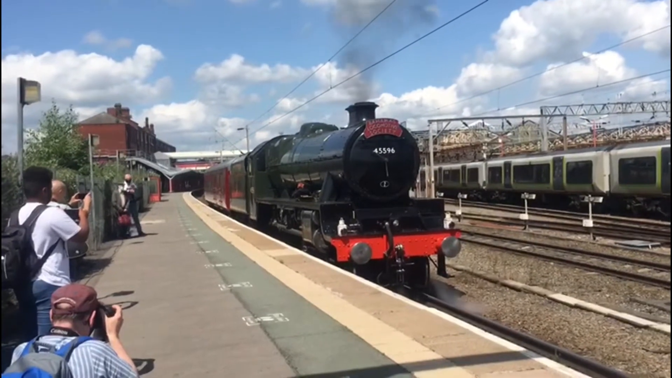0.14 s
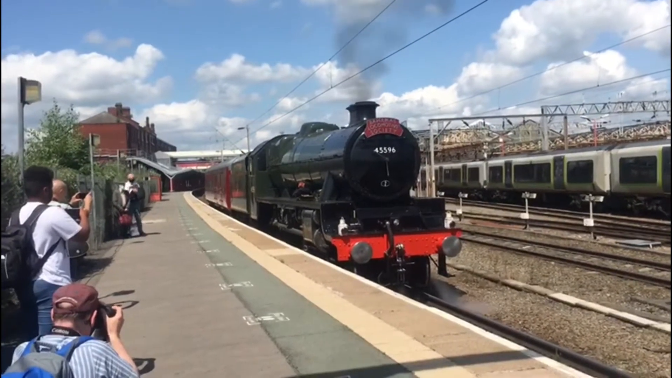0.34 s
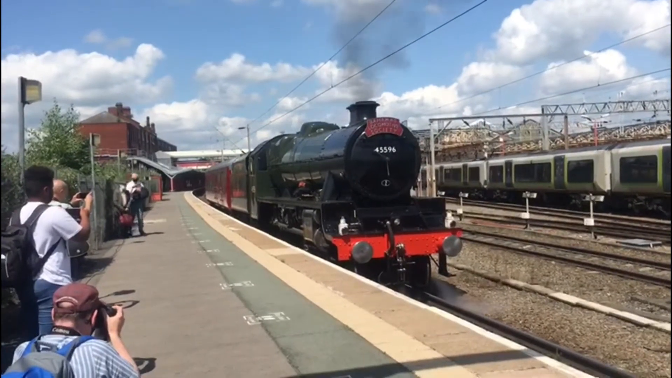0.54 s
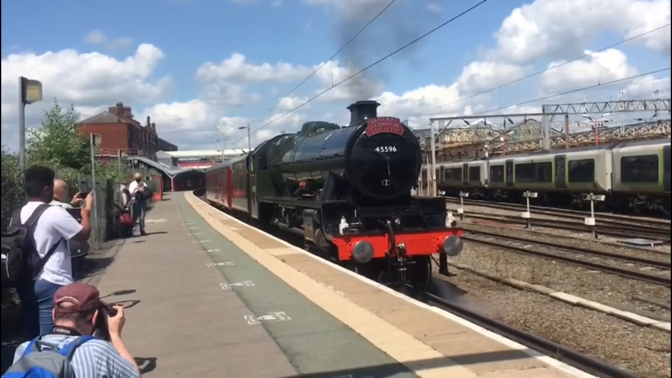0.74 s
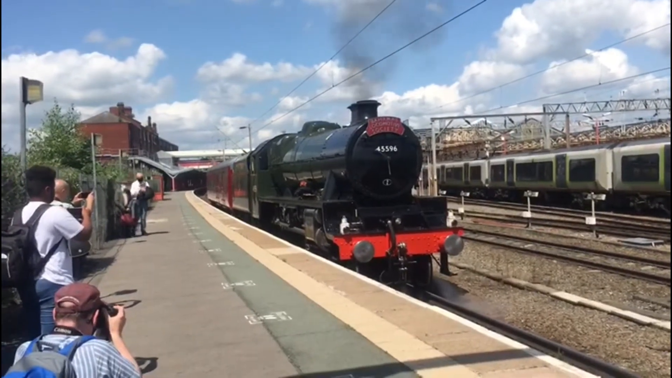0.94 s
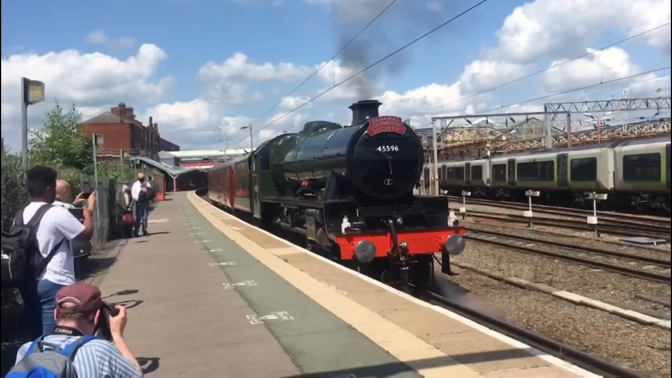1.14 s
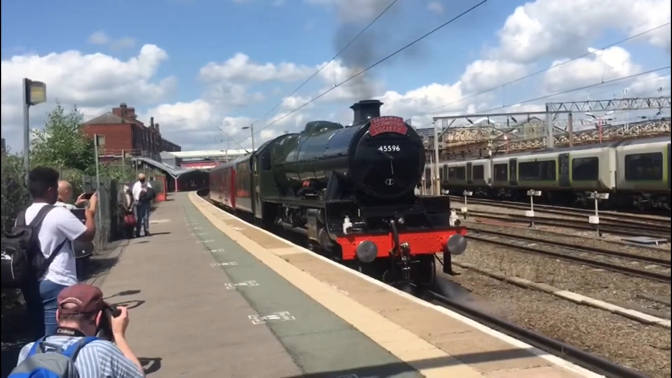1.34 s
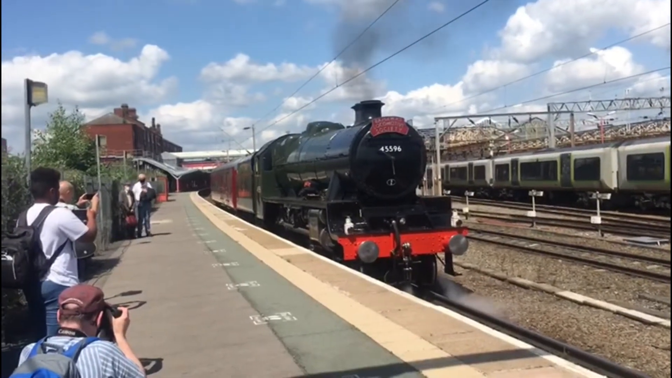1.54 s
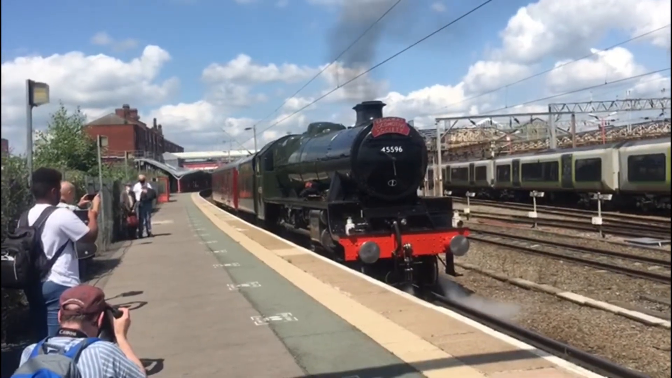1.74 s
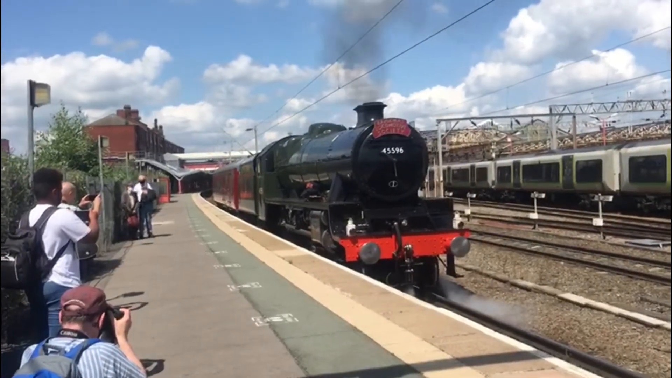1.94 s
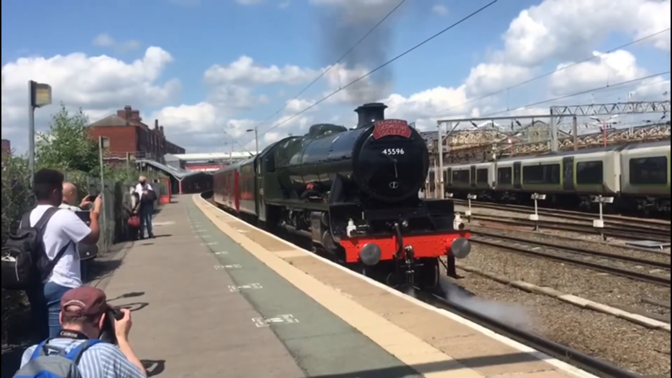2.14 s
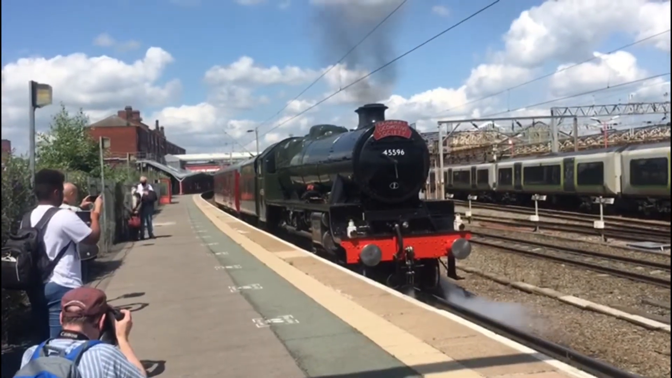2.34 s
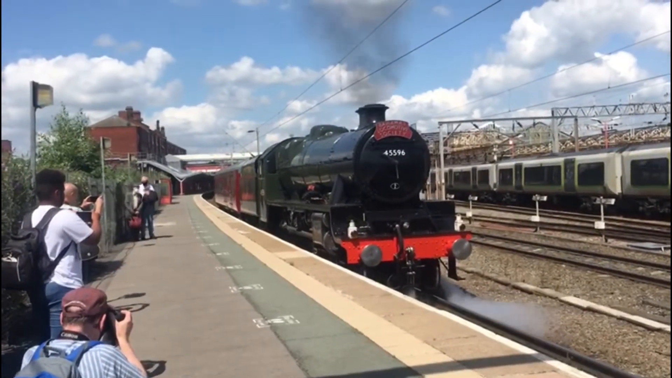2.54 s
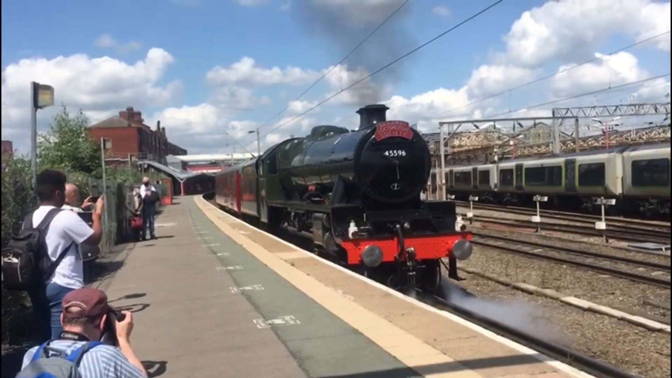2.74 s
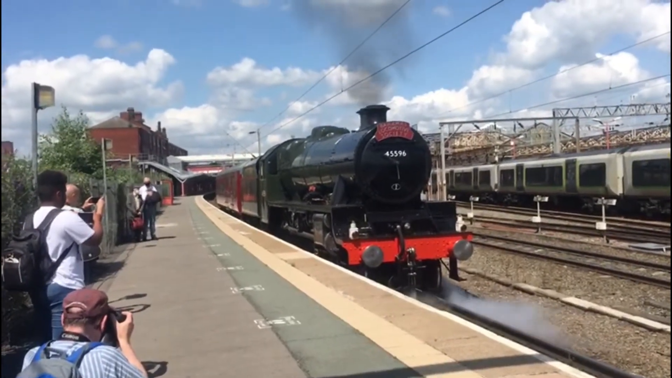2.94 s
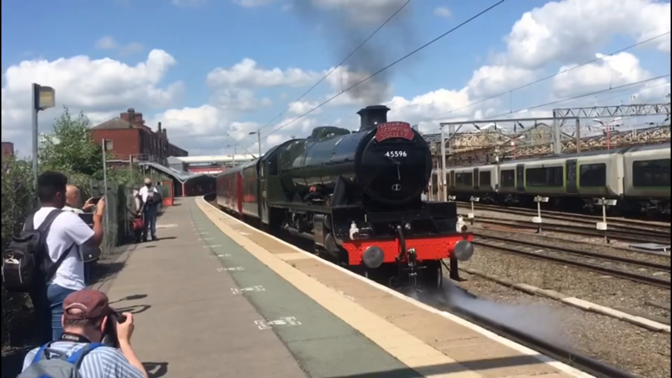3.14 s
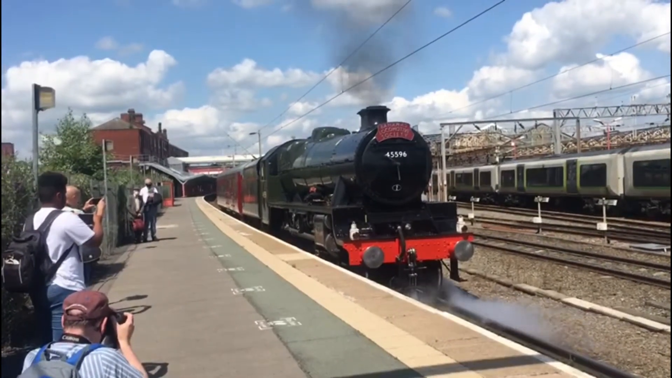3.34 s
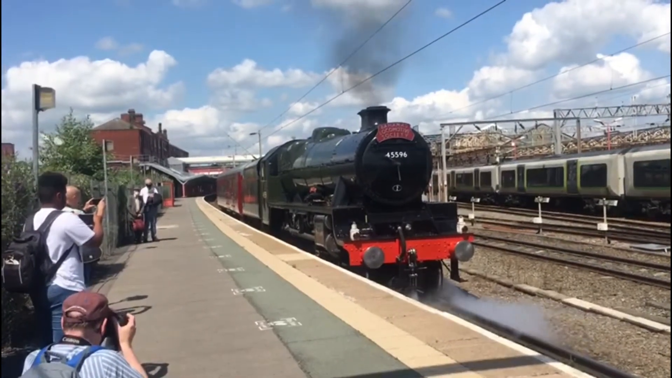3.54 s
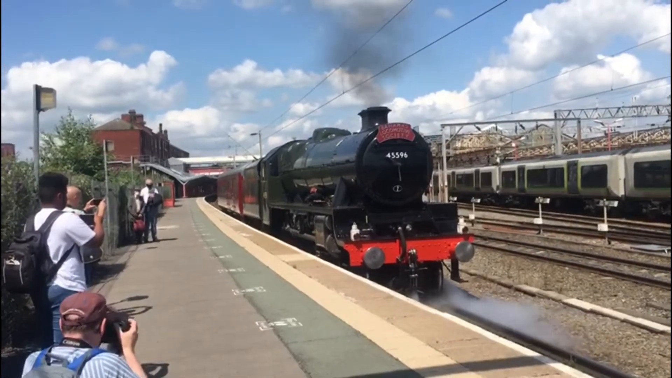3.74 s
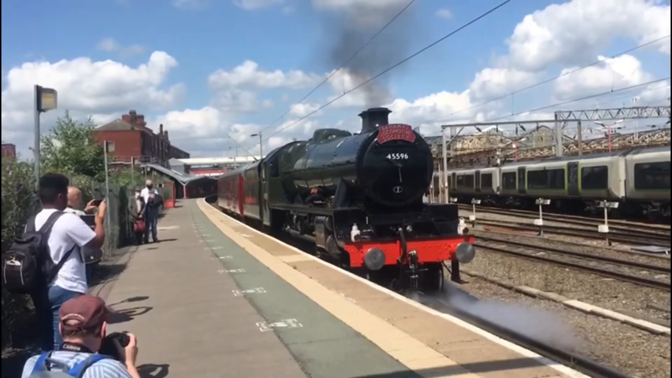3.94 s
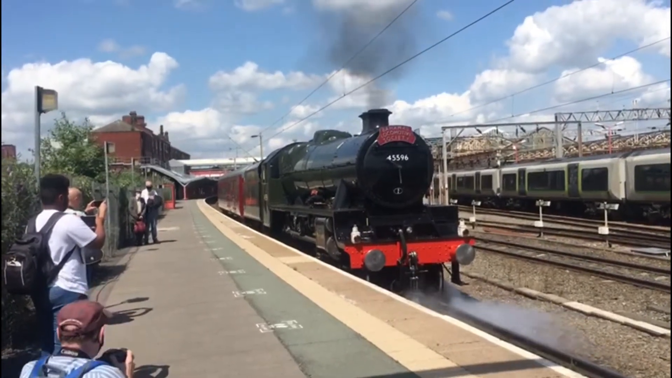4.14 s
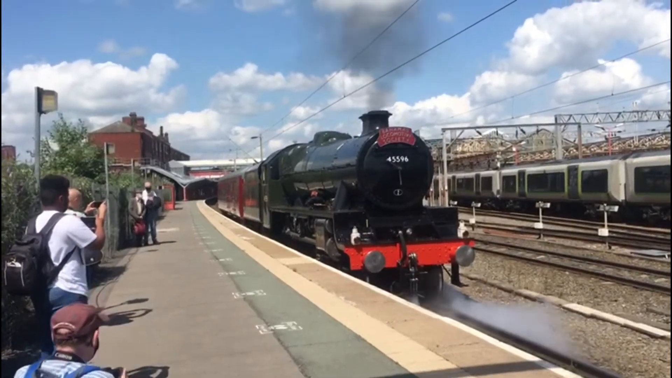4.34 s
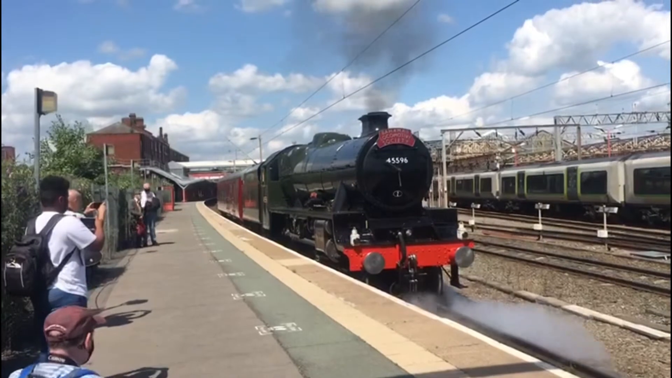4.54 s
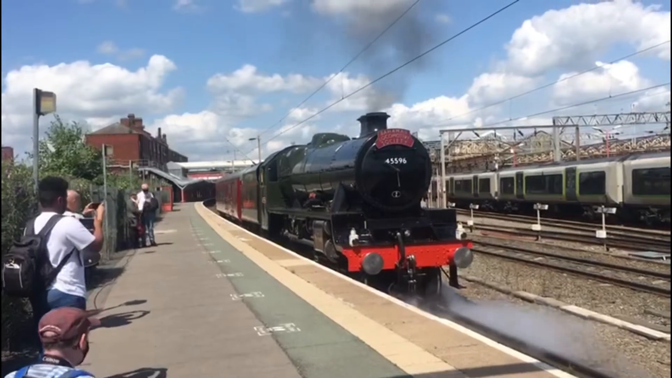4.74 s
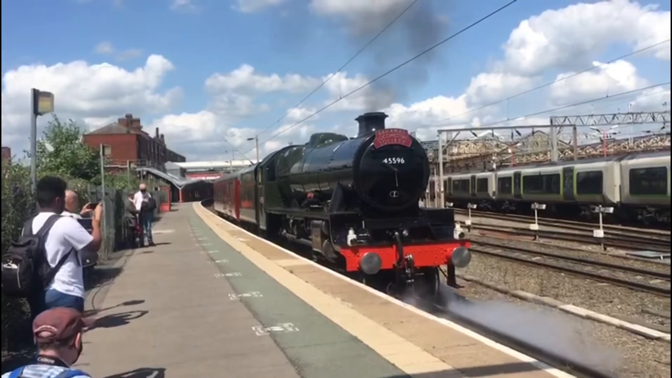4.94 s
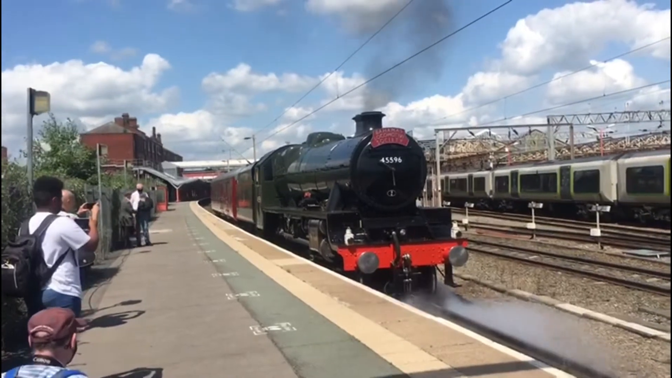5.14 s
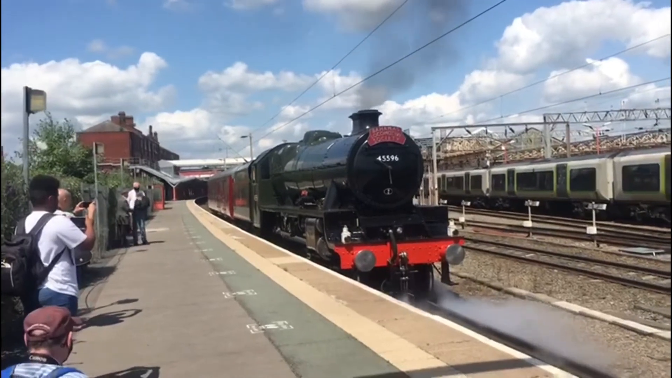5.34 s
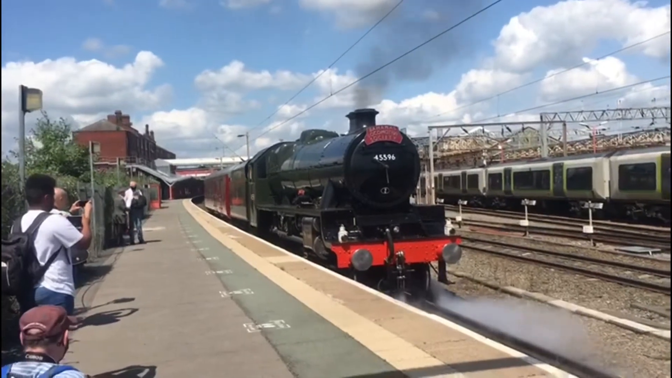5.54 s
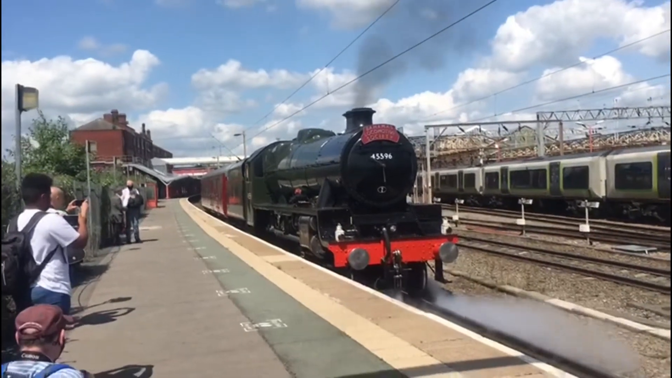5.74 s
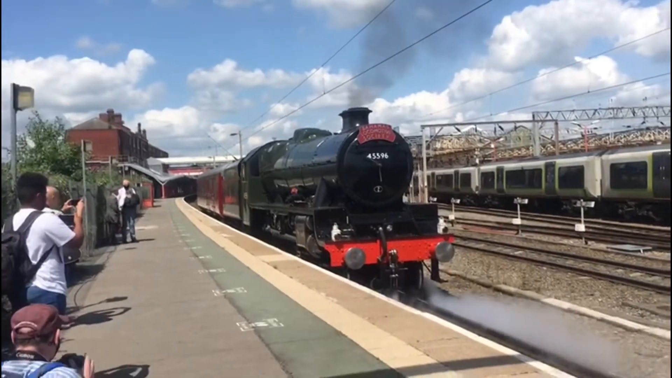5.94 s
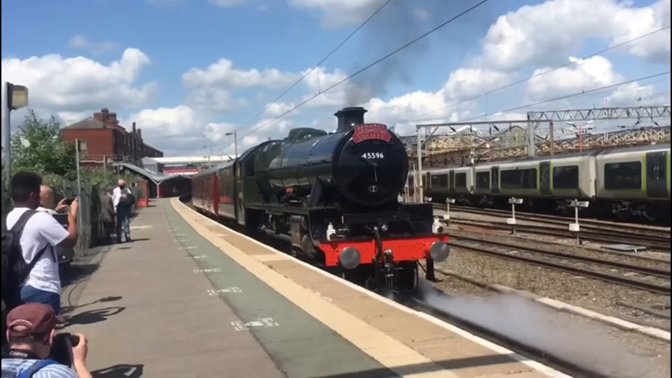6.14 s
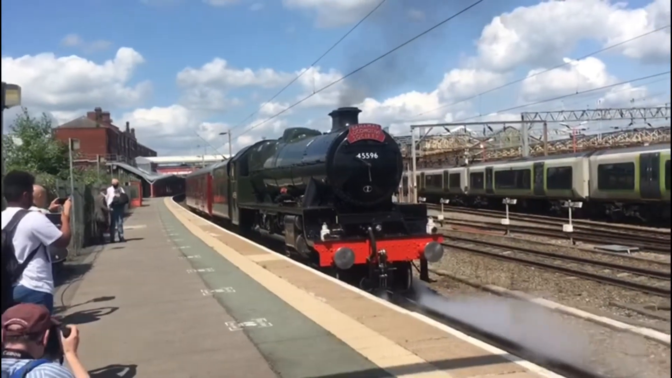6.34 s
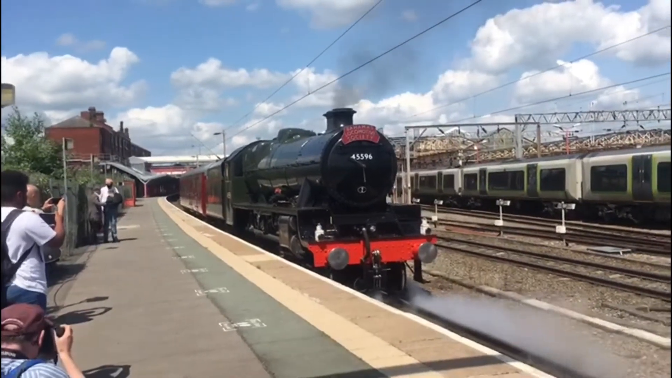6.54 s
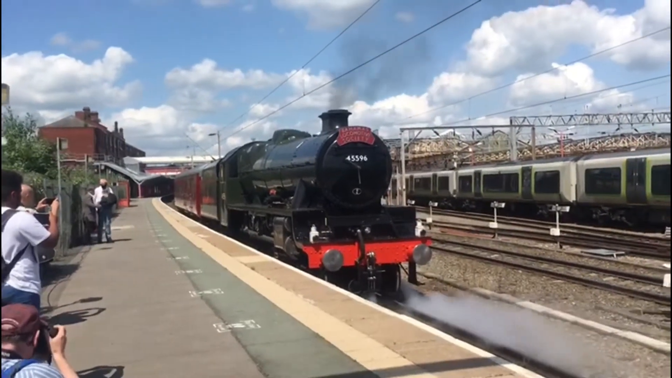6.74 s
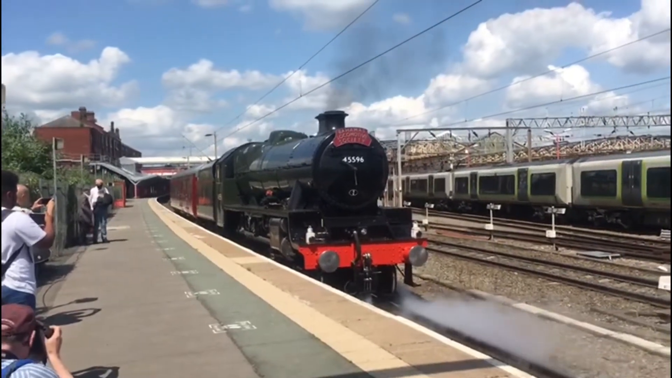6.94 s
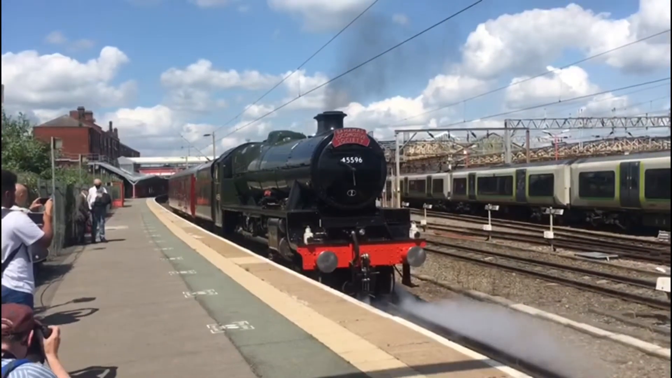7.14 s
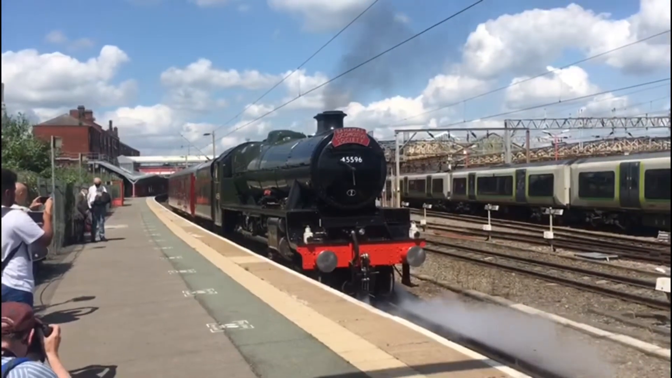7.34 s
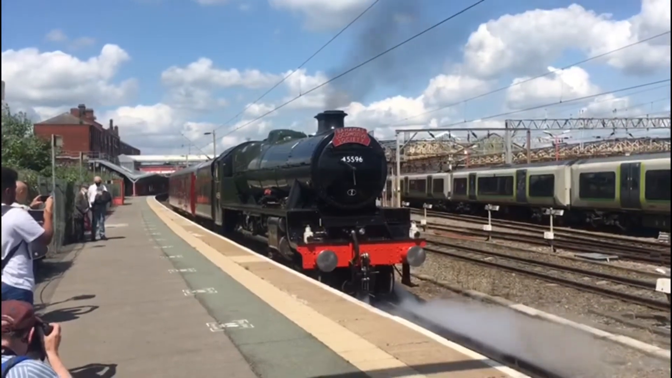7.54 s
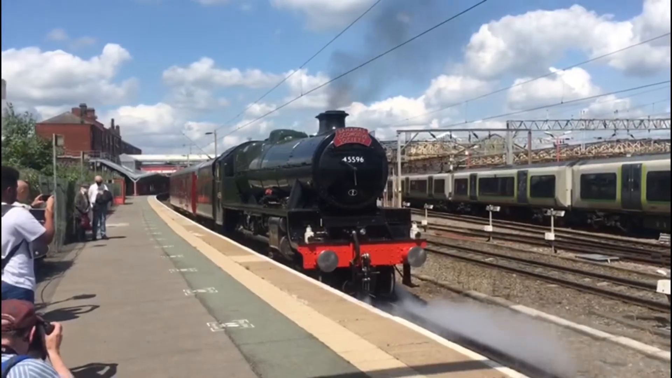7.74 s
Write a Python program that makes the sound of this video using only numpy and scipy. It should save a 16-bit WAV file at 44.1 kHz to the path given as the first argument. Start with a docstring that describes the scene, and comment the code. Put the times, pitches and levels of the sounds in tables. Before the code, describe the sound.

A steam locomotive idles in an open-air station with a low rumble and a soft leaking hiss, a faint hum behind it. Far down the platform, a high whistle gives three short, reverberant trills. The cylinder drains then open, and escaping steam builds to a loud, hissing roar with a high pipe ring, covering the rumble and holding to the end. Brief puffs of wind buffet the one microphone late on.

```python
"""A station platform, a steam locomotive standing: its fire drones, a gland hisses, a machine hums,
and a distant whistle trills three short blasts, the last followed by a brief echo. Then the cylinder
drain cocks open: a jet of steam swells, rings in the drain pipes and settles to a roar, scattered by
the wheels and frames. The low drone and rumble duck while the jet is loud.
In the last few seconds, gusts of breeze buffet the single microphone."""
import sys
import numpy as np
from scipy import signal
from scipy.fft import rfft, irfft, next_fast_len
from scipy.io import wavfile
from scipy.ndimage import uniform_filter1d, map_coordinates

SR = 44100
rng = np.random.default_rng(int(sys.argv[2]) if len(sys.argv) > 2 else 0)


def pcm_store(signal):
    """Save signal as 16-bit PCM."""
    levels = np.round(np.clip(np.atleast_2d(signal), -1, 1) * 32767)
    wavfile.write(sys.argv[1], SR, levels.astype(np.int16).T)


N = 343539

# pipework resonances, rung by both the leak and the jet: pitch_hz, width_hz, level_db
PIPE_MODES = [(2877, 140, -1), (3034, 180, 0.5), (3440, 104, 3), (3555, 85, 0), (5570, 230, -6.5),
              (5740, 140, -8), (6980, 170, -26)]


def amp(db):
    """Decibels to gain."""
    return 10 ** (np.asarray(db) / 20)


def unit(x):
    """Scale to rms 1."""
    return x / np.sqrt(np.mean(x ** 2) + 1e-20)


def curves(rows):
    """Breakpoints to envelopes, one for each column after time_s."""
    times, *columns = np.transpose(rows)
    return [np.interp(np.arange(N) / SR, times, column) for column in columns]


def wobble(rate):
    """Smooth random modulation, rate knots a second."""
    knots = rng.standard_normal(int(N * rate / SR) + 4)
    return map_coordinates(knots, [np.arange(N) * rate / SR])


def filtered(x, response):
    """EQ x with a gain given as a function of frequency."""
    size = next_fast_len(N + SR // 2)
    return irfft(rfft(x, size) * response(np.fft.rfftfreq(size, 1 / SR)), size)[:N]


def turbulence(patchy_db):
    """White noise with random patches of gain across time and frequency."""
    spectrogram = signal.stft(rng.standard_normal(N), nperseg=512)[2]
    patches = uniform_filter1d(rng.standard_normal(spectrogram.shape), size=8, axis=0)
    patches = uniform_filter1d(patches, size=22, axis=1)
    return signal.istft(spectrogram * amp(patchy_db * unit(patches)), nperseg=512)[1][:N]


def rush(spectrum, patchy_db):
    """Turbulence of rms 1, coloured by rows of freq_hz, level_db."""
    freq_hz, level_db = np.transpose(spectrum)
    colour = lambda hz: amp(np.interp(np.log(hz + 1), np.log(freq_hz), level_db, -120, -120))
    return unit(filtered(turbulence(patchy_db), colour))


def blown(modes, patchy_db):
    """Turbulence of rms 1, ringing in resonances of pitch_hz, width_hz, level_db."""
    def response(hz):
        powers = (amp(db) ** 2 / (1 + ((hz ** 2 - pitch_hz ** 2) / (hz * width_hz + 1)) ** 2) ** 1.5
                  for pitch_hz, width_hz, db in modes)
        return np.sqrt(sum(powers))
    return unit(filtered(turbulence(patchy_db), response))


def boiler():
    """The draught drones in the firebox with a wavering pitch and rumbles up the chimney."""
    # the low drone and rumble duck while the jet is loud: time_s, drone_db, rumble_db
    low_levels = [(0, -39, -43), (2.0, -39.5, -42), (2.7, -46, -40), (3.3, -54, -43), (4.3, -58, -45),
                  (6.2, -58, -45.5), (7.79, -52, -42)]
    # low resonances of the flames: pitch_hz, width_hz, level_db
    flame_modes = [(52, 14, 1), (76, 13, 1), (95, 14, -6)]
    # colour of the chimney rumble: freq_hz, level_db
    rumble_spectrum = [(22, -14), (33, -8), (48, 2), (75, 1.5), (115, -4), (160, -3), (185, 1), (230, 0),
                       (285, -3.5), (322, -8), (350, 0.5), (430, -13.5), (650, -10.5), (1200, -40)]
    drone_hz = 49
    drone_db, rumble_db = curves(low_levels)
    phase = 2 * np.pi * np.cumsum(drone_hz + 2.6 * wobble(11)) / SR
    throb = amp(3 * wobble(11))
    flames = amp(-3.5) * blown(flame_modes, patchy_db=3.5)
    drone = amp(drone_db - 3.0) * (throb * np.sin(phase) + flames)
    return drone + amp(rumble_db + 0.87) * rush(rumble_spectrum, patchy_db=0.34)


def machine_hum():
    """A faint, slightly unsteady machine hum in the station, slowly fading."""
    pitch_hz = 319.3
    level_db, = curves([(0, -45.5), (1.5, -48), (2.4, -50.5), (7.79, -60)])
    phase = 2 * np.pi * np.cumsum(pitch_hz + 0.83 * wobble(5.92)) / SR
    return amp(level_db + wobble(3.7)) * np.sin(phase)


def gland_leak():
    """Steam hisses softly from a leaking gland and rings faintly in the pipework."""
    # the leak's fader: time_s, level_db
    leak_levels = [(0, -31.5), (.5, -28.5), (1.6, -29.5), (3, -26), (7.79, -49)]
    # colour of the hiss: freq_hz, level_db
    hiss_spectrum = [(260, -40), (440, -18), (620, -4.5), (820, -9.5), (980, -5), (1300, -8), (1650, -3),
                     (1980, -6.5), (2500, -5.5), (3600, -4.5), (4750, -10.5), (5700, -6), (7600, -9),
                     (9700, -10.5), (10400, -16.5), (11700, -14.5)]
    level_db, = curves(leak_levels)
    hiss = rush(hiss_spectrum, patchy_db=0.75)
    ring = amp(-10.5) * blown(PIPE_MODES, patchy_db=4.0)
    return amp(level_db - 0.5) * (hiss + ring)


def whistle():
    """A hoarse edge tone trills in short blasts far down the platform; the station reverberates."""
    # three blasts, then a brief echo of the last: start_s, length_s, level_db, trill_depth_db
    blasts_and_echo = [(0.145, .21, -36, 1.2), (.545, .26, -37, 2), (.955, 0.34, -34.5, 5),
                       (1.4, 0.1, -38, 5)]
    # resonance of the whistle's chamber: pitch_hz, width_hz, level_db
    chamber_modes = [(2248, 90, 0)]
    attack_s, release_s = .02, .025
    trill_hz, trill_wander = 12.5, 0.37  # mean pulse rate, and the share by which it wanders
    reverb_db, reverb_t60_s = -7.5, 1.1
    t = np.arange(N) / SR
    cycles = np.cumsum(trill_hz * (1 + trill_wander * wobble(12.1))) / SR
    envelope = np.zeros(N)
    for start_s, length_s, level_db, trill_depth_db in blasts_and_echo:
        # the trill crests as the attack ends
        trill = np.cos(2 * np.pi * (cycles - np.interp(start_s + attack_s, t, cycles)))
        attack = np.clip((t - start_s) / attack_s, 0, 1)
        release = np.exp(-np.maximum(t - start_s - length_s, 0) / release_s)
        envelope += amp(level_db + trill_depth_db * trill) * attack * release
    # the edge tone saturates, so its strength holds while its pitch keeps fluttering
    edge = signal.hilbert(blown(chamber_modes, patchy_db=1.5), next_fast_len(N))[:N]
    direct = envelope * unit(edge.real / np.hypot(np.abs(edge), 1))
    tail = rng.standard_normal(SR) * amp(-60 * t[:SR] / reverb_t60_s)
    return direct + amp(reverb_db) * signal.fftconvolve(direct, tail / np.linalg.norm(tail))[:N]


def steam_jet():
    """Steam from the drain cocks: big eddies roar, the pipe mouths rush and ring, wet spray hisses."""
    # steam flow through the cocks, driving all three layers: time_s, level_db
    flow_levels = [(1.1, -41), (1.35, -30.5), (1.58, -26), (1.95, -23.5), (2.25, -19), (2.75, -15.5),
                   (3.02, -18.5), (3.33, -17.5), (3.55, -18), (3.88, -18.5), (4.3, -19.3), (4.9, -18),
                   (5.15, -18.5), (6.7, -19), (7.1, -20), (7.4, -18.5), (7.79, -19)]
    # pipe ring against the rush at the mouths: time_s, level_db
    ring_levels = [(1.1, -6), (1.65, 1), (2.7, -2.5), (3.3, -7), (4.05, 1), (4.4, -9), (5.15, -9),
                   (5.48, -1.5), (5.95, -6.5), (6.6, -3), (7.79, -5)]
    # colours of the plume, the pipe mouths and the spray: freq_hz, level_db
    roar_spectrum = [(300, -18.5), (430, -27), (490, -16), (550, -22), (610, -9.5), (860, -8), (950, -4),
                     (1030, -3.5), (1220, -.5), (1620, 0), (1750, -1.5), (1860, .5), (2500, -2),
                     (3000, -6.5), (4500, -24), (8000, -45)]
    mouth_spectrum = [(1500, -46), (2500, -10), (2850, 1), (3500, 1), (4100, 0), (4800, -7.5),
                      (5600, -14.5), (8000, -40)]
    spray_spectrum = [(3500, -29), (4900, -9), (5600, -3.5), (6200, -1), (6850, 0), (7600, -3), (9400, -1),
                      (9950, -3), (10400, -8.5), (11000, -7), (11700, -8)]
    flow_db, = curves(flow_levels)
    ring_db, = curves(ring_levels)

    # the plume roars less until the cylinders have cleared of water
    clear_at_s, clearing_s, wet_roar_db = 3.7, 0.39, -2
    wet = .5 - .5 * np.tanh((np.arange(N) / SR - clear_at_s) / clearing_s)
    roar_db = flow_db - 1.1 + wet_roar_db * wet + 0.4 * wobble(7)
    roar = amp(roar_db) * rush(roar_spectrum, patchy_db=0.5)

    mouth_db = flow_db + 0.56 + 0.32 * ring_db  # the mouths get louder as they ring
    ring = amp(ring_db) * blown(PIPE_MODES, patchy_db=1)
    mouth_rush = rush(mouth_spectrum, patchy_db=1)
    mouth = amp(mouth_db) * unit((mouth_rush + ring) / np.hypot(1, amp(ring_db)))

    # the finest fizz comes in as the jet gathers speed
    speed, = curves([(1.6, 0.18), (2.4, 0.59), (3.2, 0.62)])
    fizz_hz, pivot_db, spray_growth = 8980, -21, 1.14  # growth: dB of spray per dB of flow
    drops = rush(spray_spectrum, patchy_db=1.2)
    fizz = filtered(drops, lambda hz: 1 - 1 / (1 + (hz / fizz_hz) ** 10))
    spray_db = pivot_db + 0.7 + spray_growth * (flow_db - pivot_db) + .3 * wobble(18)
    spray = amp(spray_db) * (drops - (1 - speed) * fizz)

    opening, = curves([(1.05, 0.19), (1.3, 1)])
    flutter = amp(0.39 * wobble(24))  # from water carried along with the steam
    return opening * flutter * (roar + mouth + spray)


def frame_scatter(steam, scatter_db, t60_s):
    """Wheels, frames and rails scatter the steam noise in a short burst of echoes."""
    t = np.arange(SR // 16) / SR
    echoes = rng.standard_normal(len(t)) * amp(-60 * t / t60_s) * (t > .004)
    return steam + amp(scatter_db) * signal.fftconvolve(steam, echoes / np.linalg.norm(echoes))[:N]


def breeze():
    """Short gusts thump on the microphone; the sharpest ones are the brightest."""
    # bell-shaped gusts: peak_s, level_db, width_s, cutoff_hz
    gusts = [(4.859, -38, .06, 60), (5.68, -45, .12, 80), (6.547, -38, .048, 201), (6.666, -34, 0.024, 900),
             (6.8, -33.5, .01, 900), (6.842, -37, 0.014, 200), (7.132, -41, .064, 400),
             (7.68, -40, .05, 201)]
    # colour of the buffeting: freq_hz, level_db
    buffet_spectrum = [(20, -20), (45, -6), (70, -2.5), (110, -4), (220, -3.5), (400, -14), (900, -40)]
    t = np.arange(N) / SR
    buffet = rush(buffet_spectrum, patchy_db=0.0)
    wind = np.zeros(N)
    for peak_s, level_db, width_s, cutoff_hz in gusts:
        swell = np.exp(-.5 * ((t - peak_s) / width_s) ** 2)
        thump = unit(filtered(buffet, lambda hz: 1 / np.hypot(1, (hz / cutoff_hz) ** 2)))
        wind += amp(level_db) * swell * thump
    return wind


def scene():
    """Everything meets at one microphone, the same in both channels."""
    steam = frame_scatter(steam_jet() + gland_leak(), scatter_db=-12.5, t60_s=0.059)
    mono = steam + whistle() + boiler() + machine_hum() + breeze()
    return np.array([mono, mono])


def record(dry):
    """A soft clip rounds the highest peaks, then a brick-wall low-pass takes off the top."""
    ceiling, cutoff_hz = .85, 11850
    rounded = dry / (1 + np.abs(dry / ceiling) ** 10) ** (1 / 10)
    return np.array([filtered(channel, lambda hz: hz < cutoff_hz) for channel in rounded])


dry = scene()
out = record(dry)
pcm_store(out)
```